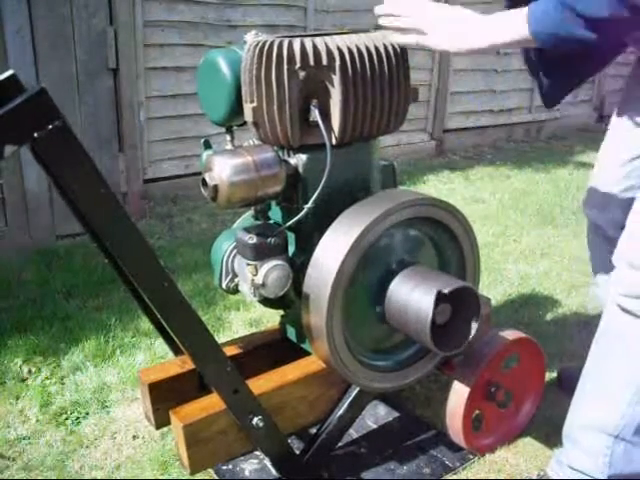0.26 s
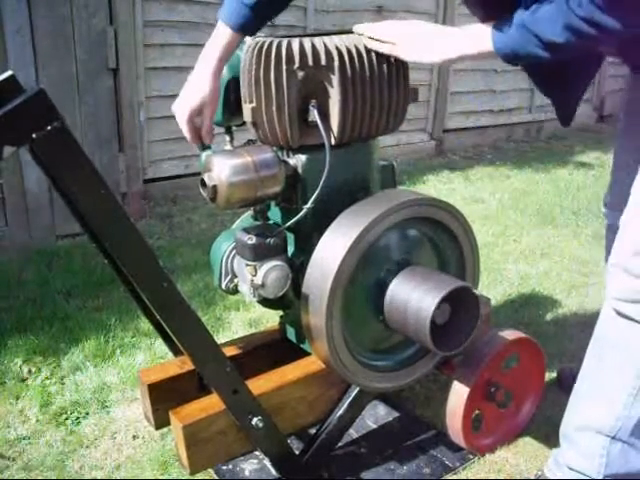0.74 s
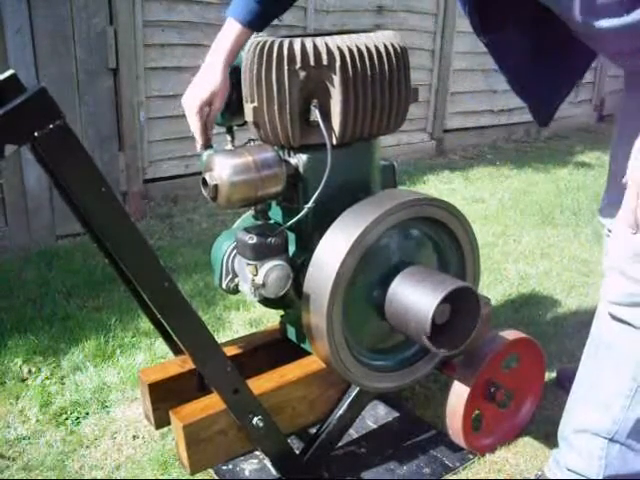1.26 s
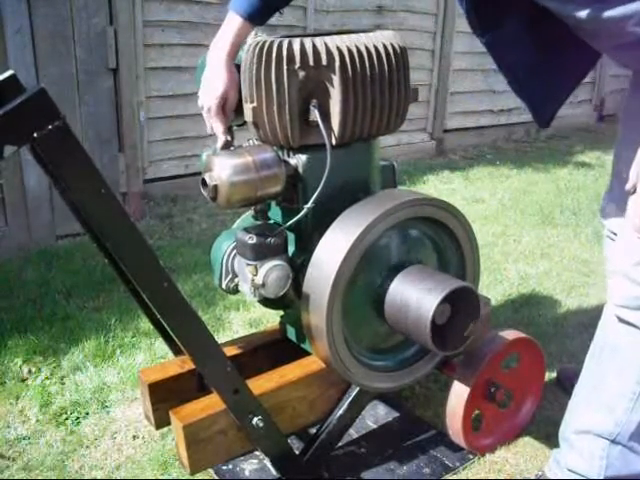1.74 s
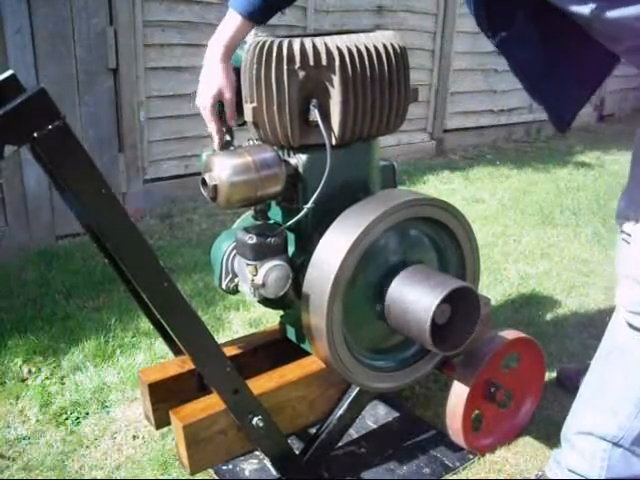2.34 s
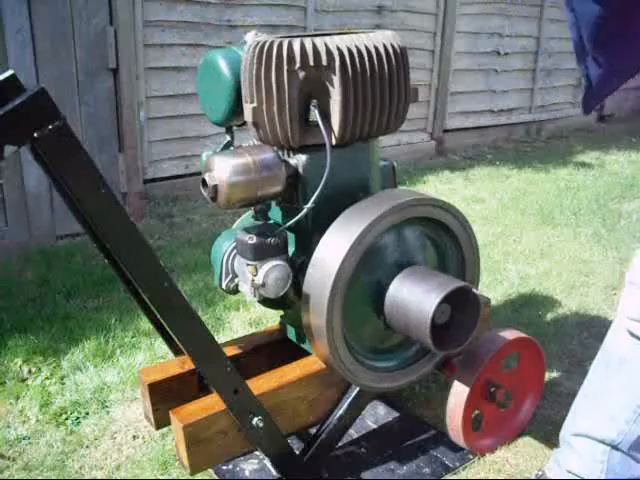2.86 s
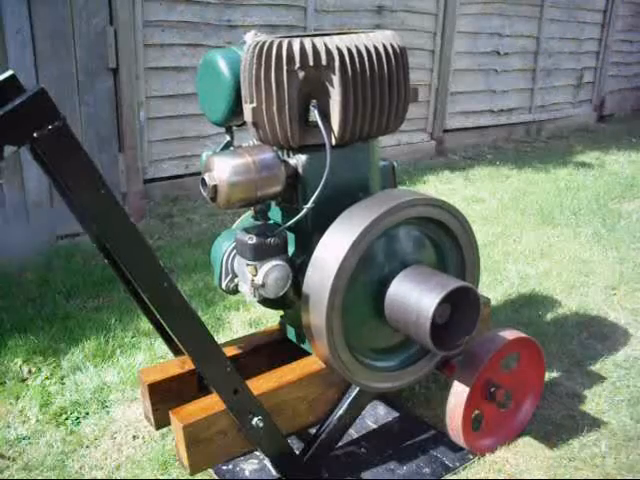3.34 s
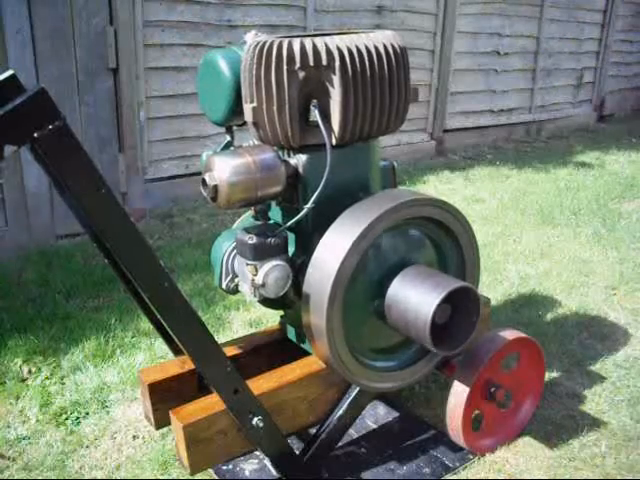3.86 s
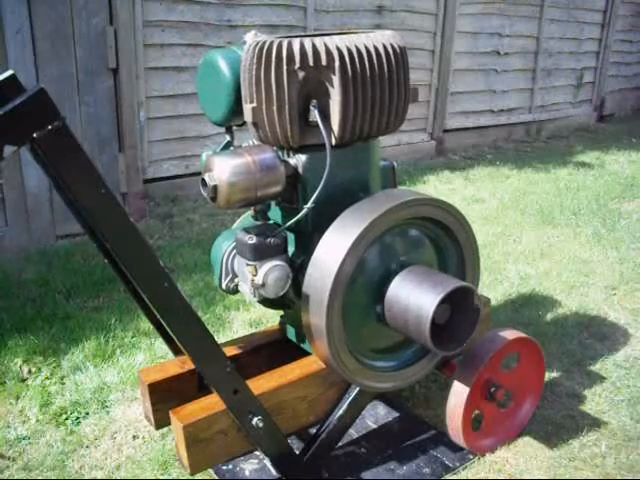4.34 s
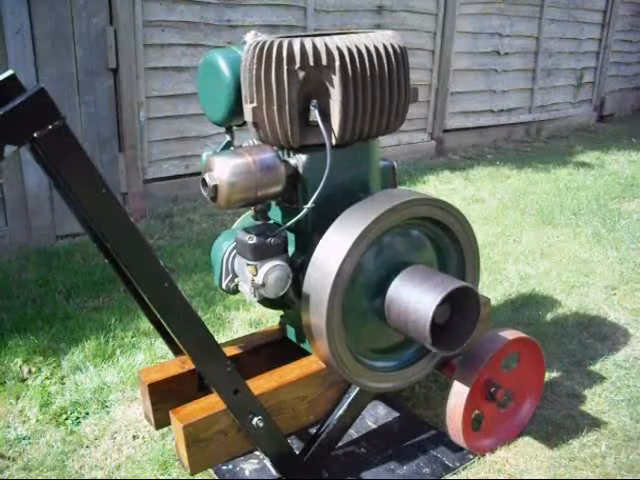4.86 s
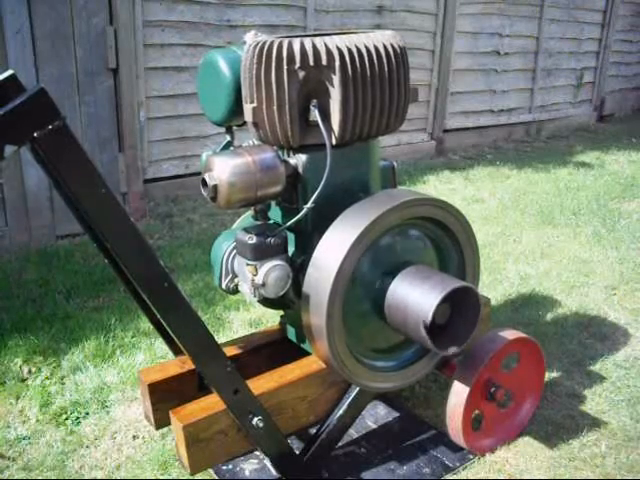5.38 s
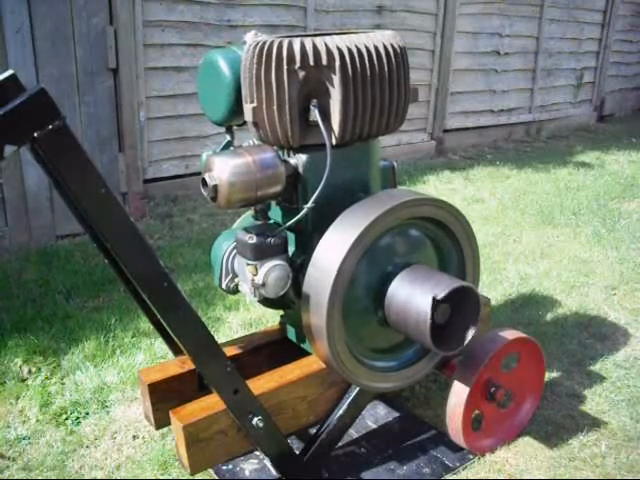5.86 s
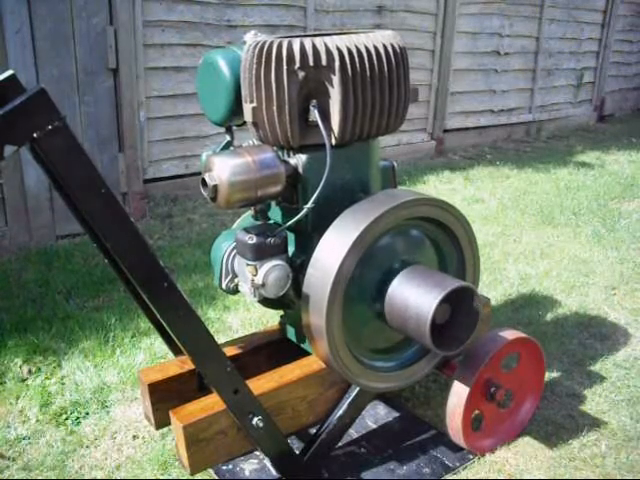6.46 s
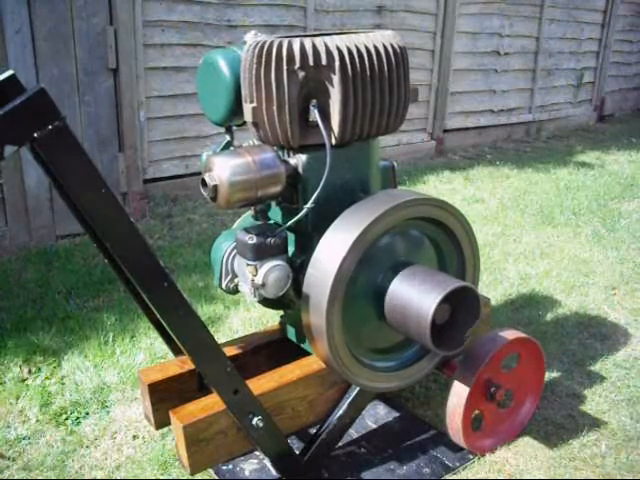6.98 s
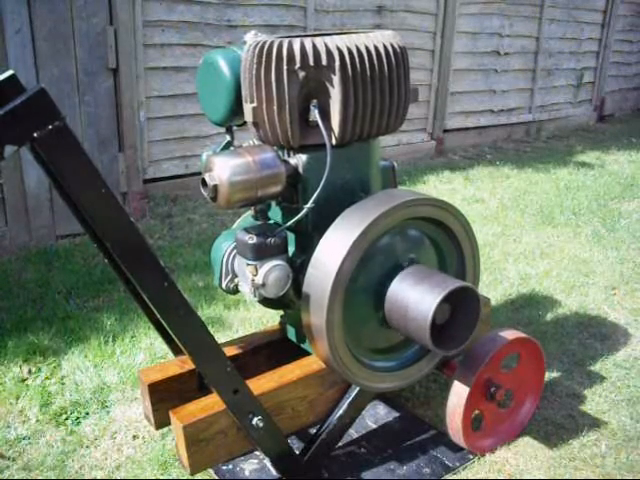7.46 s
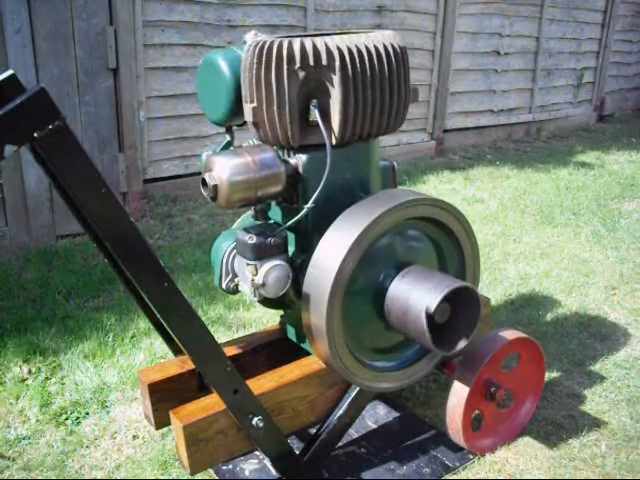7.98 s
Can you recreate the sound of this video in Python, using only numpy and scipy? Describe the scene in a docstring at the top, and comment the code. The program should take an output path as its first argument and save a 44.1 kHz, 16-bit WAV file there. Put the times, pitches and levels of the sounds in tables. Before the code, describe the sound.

A small single-cylinder stationary engine, just started, chuffs slowly with a hissing intake and grows faster and louder. After a couple of seconds it misfires for about a second, catches again, and settles into a quieter, even beat of about six firings a second. Valve clicks and a gear whirr run beneath the thumping, tinny exhaust. It is heard close by in a garden, through a cheap microphone with a glassy treble.

```python
"""A small engine warming up in a garden

A single-cylinder four-stroke petrol engine, just swung by hand, gathers speed on the choke. It runs
rich, misses a few beats as the choke opens, then settles near six firings a second. Each firing is a
pressure pulse that chuffs through a small resonant silencer, over valve impacts and gear noise; fence
and house reflect the sound. A pocket camera's low sample rate mirrors it into a glassy treble."""
import sys
import numpy as np
from scipy import signal
from scipy.fft import rfft, irfft, next_fast_len
from scipy.io import wavfile
from scipy.ndimage import uniform_filter1d

SR = 44100
rng = np.random.default_rng(int(sys.argv[2]) if len(sys.argv) > 2 else 0)


def wrap_up_sound(samples):
    """Save the sound to the file named by the first command line argument, as 16-bit audio."""
    columns = np.atleast_2d(samples).T
    # keep every value between -1 and 1, then stretch to whole-number steps
    tamed = np.clip(columns, -1, 1)
    steps = np.round(tamed * 32767).astype(np.int16)
    wavfile.write(sys.argv[1], SR, steps)


N = 362061
TIME = np.arange(N) / SR
BAND_HZ = 5600  # upper limit of the camera's passband
IDLE_RPM, IDLE_DB, IDLE_BLOWDOWN_S = 740, -27, .0159  # speed, burn level, time to empty the cylinder


def amp(db):
    """Amplitude ratio of a level in decibels."""
    return 10 ** (np.asarray(db) / 20)


def unit_rms(x):
    """Normalises a signal to unit mean power."""
    return x / np.sqrt(np.mean(x ** 2) + 1e-20)


def curve(points, at):
    """Linear interpolation in a two-column table."""
    return np.interp(at, *np.transpose(points))


def log_curve(points, hz):
    """Interpolation on a logarithmic frequency axis."""
    f, value = np.transpose(points)
    return np.interp(np.log(hz + 1), np.log(f + 1), value)


def add(mix, s, sound):
    """Superposition: mixes a sound in at time s."""
    start = round(s * SR)
    sound = sound[max(-start, 0):]
    part = mix[max(start, 0):][:len(sound)]
    part += sound[:len(part)]


def colour(x, spectrum, tilt_db=0):
    """Band-limited filtering: gives x a spectral envelope, tilted by tilt_db per octave."""
    hz = np.fft.rfftfreq(len(x), 1 / SR)
    db = log_curve(spectrum, hz) + tilt_db * np.log2(np.maximum(hz, 500) / 2000)
    return irfft(rfft(x) * amp(db) * (hz < BAND_HZ * 1.1), len(x))


def noise(spectrum, size):
    """Filtered Gaussian noise of unit power."""
    return unit_rms(colour(rng.standard_normal(next_fast_len(size)), spectrum)[:size])


def ring(modes, pitch=1):
    """Modal impulse response: a sum of damped sinusoids, with unit energy."""
    t = np.arange(SR // 6) / SR
    out = sum(amp(db - 60 * t / t60) * np.sin(2 * np.pi * hz * pitch * t) for hz, db, t60 in modes)
    return out / np.linalg.norm(out)


# crankshaft rotation: (time [s], speed [rpm])
CRANK_SPEED = [(0.0, 262.0), (0.49, 380.8), (0.8, 444.4), (1.24, 527.4), (1.61, 574.9), (2.1, 705.0),
               (2.4, 786.9), (2.8, 722.7), (3.49, 662.2), (3.51, 698.9), (3.87, 699.4), (4.3, 720.0),
               (5.45, 735.3), (6.26, 735.1), (7.45, 743.3), (8.2, 753.3)]

def strokes(first_exhaust_s=.3426):
    """Four-stroke cycle: the times of the exhausts, one every two turns, plus one beyond either end."""
    t = np.arange(-SR, N + SR, 16) / SR
    cycles = np.cumsum(curve(CRANK_SPEED, t) / 120) * (t[1] - t[0])
    cycles -= np.interp(first_exhaust_s, t, cycles)
    return np.interp(np.arange(-1, np.interp(N / SR, t, cycles) + 1), cycles, t)


def time_of(cycles):
    """Time at which the engine reaches a phase, counted in cycles."""
    return np.interp(cycles, np.arange(len(strokes())), strokes())


# envelope of the running gear: (time [s], level [dB])
GEAR_LEVEL = [(0, -44.5), (.25, -50), (.6, -46.5), (1.2, -45), (1.8, -44.5), (2.3, -42), (2.7, -48),
              (3.5, -46), (5, -46.5), (8.2, -45)]
# friction noise of gears and bearings: (frequency [Hz], relative level [dB])
GEAR_SPECTRUM = [(88, -66), (150, -19), (242, -14), (363, -13.5), (623, -8.5), (1150, -5), (1600, -2.5),
                 (1830, -0.5), (2370, -4.5), (2790, -2), (3240, -7), (4310, -10), (5400, -8), (7020, -53),
                 (11900, -120)]
# vibration of the frame on its trolley: (frequency [Hz], relative level [dB])
FRAME_SPECTRUM = [(20, 6), (40, 12), (65, 15), (110, 10.5), (170, 0), (300, -17), (600, -37)]
# cast-iron block and flywheel: (frequency [Hz], relative level [dB], decay time T60 [s])
IRON_MODES = [(481, 6.5, 0.12), (874, 2, 0.12), (981, -0.5, 0.12), (1150, 2.5, 0.17), (1463, 9.5, 0.035),
              (1805, 7, 0.018), (2110, 2.5, 0.026), (2380, -0.5, 0.022)]

def running_gear(grit=.28, iron_db=-7, whirr_db=-2, rumble_db=-3):
    """Forced vibration: gears and bearings drive the iron's modes; the frame rumbles more with speed."""
    teeth = np.exp(grit * unit_rms(uniform_filter1d(rng.standard_normal(N), 150)))
    grind = unit_rms(noise(GEAR_SPECTRUM, N) * teeth)
    iron = unit_rms(signal.oaconvolve(grind, ring(IRON_MODES))[:N])
    shake = (curve(CRANK_SPEED, TIME) / IDLE_RPM) ** .76
    rumble = shake * noise(FRAME_SPECTRUM, N)
    level = amp(curve(GEAR_LEVEL, TIME))
    return level * (amp(whirr_db) * grind + amp(iron_db) * iron + amp(rumble_db) * rumble)


def impact(spectrum, decay_s, tilt_db, attack_s=.0017):
    """Transient noise: a rattling broadband burst that decays exponentially."""
    t = np.arange(SR // 12) / SR
    rattle = unit_rms(colour(rng.standard_normal(len(t)), spectrum, tilt_db))
    return rattle * (1 - np.exp(-t / attack_s)) * np.exp(-t / decay_s)


# valve clicks and clacks, plus a dull echo-like slap at phase .25, about 40 ms after each exhaust at idle:
# (phase after exhaust [cycles], relative level [dB], decay time [s], tilt [dB/octave])
CLATTER_EVENTS = [(0.207, -33.5, 0.0064, -2), (.25, -32.5, 0.0025, -7), (.445, -42.5, 0.01, -9),
                  (.49, -29.5, 0.0033, 9), (0.519, -37.5, 0.0072, -4.5), (.67, -42, 0.0044, 3)]
# one click: (frequency [Hz], relative level [dB])
CLICK_SPECTRUM = [(300, -15), (1000, -11), (2000, 12), (3000, 16), (4200, 19), (5500, 9)]

def valve_clatter(level_db=5, scatter_db=1.0, iron_db=-8):
    """Impact excitation: valve clicks and clacks, with a dull slap, recur each cycle, louder with speed."""
    out, periods = np.zeros(N), np.diff(strokes())
    for cycle, speed in enumerate(periods.min() / periods):
        for phase, db, decay_s, tilt_db in CLATTER_EVENTS:
            gain = speed ** 2 * amp(db + level_db + scatter_db * rng.standard_normal())
            add(out, time_of(cycle + phase) - .002, gain * impact(CLICK_SPECTRUM, decay_s, tilt_db))
    return out + amp(iron_db) * signal.oaconvolve(out, ring(IRON_MODES))[:N]


def valve_window(opens, shuts, edge):
    """Periodic gating: 1 while a valve is open, with sloping edges; arguments in cycles."""
    phase = np.interp(TIME, strokes(), np.arange(len(strokes()))) % 1
    return np.clip((phase - opens) / edge, 0, 1) * np.clip((shuts - phase) / edge, 0, 1)


# air drawn through the carburettor: (time [s], hiss level [dB], gasp level [dB])
INTAKE_LEVELS = [(.1, -37.5, -60), (.46, -35.5, -56), (1.0, -36.5, -59), (1.499, -34.5, -53),
                 (1.68, -44, -31), (2.051, -46, -28), (2.38, -39, -29), (2.5, -49, -49), (3.5, -87, -44),
                 (8.1, -64, -47.5)]
# air passing the choke: (frequency [Hz], relative level [dB])
HISS_SPECTRUM = [(200, -77), (900, -28), (1700, 0.5), (2300, 8.5), (3000, 1.5), (4300, 7), (5500, 4)]
# the rich charge: (frequency [Hz], relative level [dB])
CHARGE_SPECTRUM = [(150, -21), (500, 2), (1100, 3), (2300, 6.5), (3200, 3), (5500, 1.5)]

def intake():
    """Flow noise: on each suction stroke air hisses past the choke and gasps through the carburettor."""
    s, hiss_db, gasp_db = np.transpose(INTAKE_LEVELS)
    suction = valve_window(opens=.18, shuts=.58, edge=.13)
    gulp = valve_window(opens=.22, shuts=.45, edge=.06)
    hiss = amp(np.interp(TIME, s, hiss_db)) * noise(HISS_SPECTRUM, N) * suction
    gasp = amp(np.interp(TIME, s, gasp_db)) * noise(CHARGE_SPECTRUM, N) * gulp
    return hiss + gasp


# the burn, hard on the choke and easing to idle: (time [s], level [dB], tilt [dB/octave])
BURN_STRENGTH = [(.34, -19.5, 2), (0.931, -16.5, 3), (1.4, -17.5, 2.5), (1.811, -14, -1.5),
                 (2.331, -11.5, -2), (3.14, -18, 6), (3.5, -18, -0.5), (3.67, -17.5, 1.4),
                 (4.35, -20.5, 0.5), (4.68, -19.5, -0.5), (4.85, -23.5, -2.5), (5.75, -28, -1.5),
                 (6.0, -26.5, 0), (6.649, -27, -0.5), (8.1, -28, -2.8)]
# cycles that burn badly or not at all; a negative thump factor is air sucked back in:
# (time [s], level change [dB], tilt change [dB/octave], thump factor [ratio], puff level [dB])
FAILED_BURNS = [(2.478, -26, -2, 0.29, -33), (2.64, -23, -9, -0.84, -32), (2.802, -7.5, -5.5, 0.43, -62),
                (2.97, -12, -7.5, 0.29, -55), (3.315, -24.5, -9, -0.77, -36.5)]

def firings(idle_thump=.11):
    """Blowdown: a harder burn takes longer to leave the cylinder and thumps more. One row per cycle."""
    s = strokes()[1:-1]
    at, burn_db, burn_tilt = np.transpose(BURN_STRENGTH)
    speed = curve(CRANK_SPEED, s) / IDLE_RPM
    db, tilt = np.interp(s, at, burn_db), np.interp(s, at, burn_tilt)
    blowdown_s = IDLE_BLOWDOWN_S * amp(.1342 * (db - IDLE_DB)) / np.sqrt(speed)
    height = idle_thump * amp(.07 * (db - IDLE_DB)) * speed ** .53
    for missed_s, db_change, tilt_change, thump_factor, _ in FAILED_BURNS:
        nearest = np.argmin(abs(s - missed_s))
        db[nearest] += db_change
        tilt[nearest] += tilt_change
        height[nearest] *= thump_factor
    return np.transpose([s, blowdown_s, db, tilt, height])


def knock(phase=.735, level_db=-29, db_per_burn_db=.55, idle_decay_s=.0059, iron_db=-3):
    """Impulsive excitation: each charge ignites half a turn before its exhaust and jolts the block."""
    out = np.zeros(N)
    for cycle, (_, blowdown_s, burn_db, *_) in enumerate(firings()):
        decay_s = idle_decay_s * blowdown_s / IDLE_BLOWDOWN_S
        jolt = impact(CHARGE_SPECTRUM, decay_s, tilt_db=-.5, attack_s=.001)
        add(out, time_of(cycle + phase), amp(level_db + db_per_burn_db * burn_db) * jolt)
    return out + amp(iron_db) * signal.oaconvolve(out, ring(IRON_MODES))[:N]


def thump(blowdown_s, rebound=.62, swing=.42, pop=.49, band_hz=(14, 480)):
    """Monopole radiation: pressure follows the change of a flow that swells, collapses and swings back."""
    stretch = (blowdown_s / IDLE_BLOWDOWN_S) ** .71  # slower after a long blow
    drop_s, settle_s, swing_hz = .0044 * stretch, .0075 * stretch, 116 / np.sqrt(stretch)
    t = np.arange(SR // 8) / SR
    peak_s, empty_s = blowdown_s - drop_s / 2, blowdown_s + drop_s / 2
    after = np.maximum(t - empty_s, 0)
    swell = np.minimum(t / peak_s, 1) ** (225 * blowdown_s / stretch)
    collapse = 1 - (1 + rebound) * (t - peak_s) / drop_s
    sway = 1 - swing + swing * np.cos(2 * np.pi * swing_hz * after)
    backflow = -rebound * np.exp(-after / settle_s) * sway
    flow = np.select([t < peak_s, t < empty_s], [swell, collapse], backflow)
    pressure = np.gradient(flow) * SR * drop_s / (1 + rebound)
    pressure -= pop * np.exp(-.5 * ((t - .0006) / .00063) ** 2)  # the valve cracks open
    return signal.sosfilt(signal.butter(1, band_hz, "bandpass", fs=SR, output="sos"), pressure)


# rush of gas at the outlet: (frequency [Hz], relative level [dB])
JET_SPECTRUM = [(100, -10), (290, -49), (410, 1.5), (630, -56), (880, -79), (1250, -12), (1550, -12),
                (2100, 6), (2450, -0.5), (3100, 10), (3800, 4.5), (4400, 9.5), (4900, 11.5), (5500, 1)]
# the silencer's thin steel shell: (frequency [Hz], relative level [dB], decay time T60 [s])
SHELL_MODES = [(1250, -7, .02), (1430, -10, .03), (1868, -5, .045), (2150, -4, .025), (2720, -5, .025),
               (2826, -3, .035), (2910, -1, .04), (3420, -5, .02), (3620, -1, .035), (4140, -3, .03),
               (4340, -1, .025), (4436, 1, .04), (4550, -1, .03), (5330, -3, .02)]

def blast(blowdown_s, db, tilt_db, leak=.27, fade_s=.0098, crackle=.21, shell_db=-2):
    """Jet noise: gas leaks as the valve lifts, then bursts out, crackling and rattling the shell."""
    t = np.arange(SR // 5) / SR
    progress = t / blowdown_s
    burst = np.exp(-.5 * ((progress - .64) / .17) ** 2)
    trickle = leak * np.clip(progress / .19, 0, 1) * np.exp(-np.maximum(t - blowdown_s, 0) / fade_s)
    shocks = np.exp(crackle * np.repeat(rng.standard_normal(len(t)), 12)[:len(t)])
    rush = rng.standard_normal(len(t)) * shocks * np.hypot(burst, trickle)
    shell = signal.fftconvolve(rush, ring(SHELL_MODES))[:len(t)]
    chuff = unit_rms(colour(rush, JET_SPECTRUM, tilt_db)) + amp(shell_db) * unit_rms(shell)
    return amp(db) * unit_rms(chuff) * np.sqrt(.04 / t[-1])  # the energy of 40 ms at level db


# effect of the exhaust gas's heat and richness: (time [s], speed of sound [ratio])
SOUND_SPEED = [(.3, .996), (1.4, 1.004), (1.61, 1.03), (2.33, 1.062), (2.8, 1.048), (3.14, 1.0),
               (3.67, 1.008), (4.2, .997), (5.4, .995), (6.0, .987), (8.1, .985)]
# gas in the silencer can: (frequency [Hz], relative level [dB], decay time T60 [s])
CAVITY_MODES = [(2830, -12, .09), (2990, -9, .09), (3790, -11, .09), (4015, 0, .13), (4230, -2, .12),
                (4400, -12, .08), (4625, -6, .1)]

def ping(s, db, scatter_db=1.5, attack_s=.002, waver_rad=.3):
    """Cavity resonance: the can's modes scale with the speed of sound and waver as the hot gas swirls."""
    t = np.arange(SR // 5) / SR
    pitch = curve(SOUND_SPEED, s)
    out = np.zeros(len(t))
    for hz, mode_db, t60 in CAVITY_MODES:
        swirl = waver_rad * unit_rms(uniform_filter1d(rng.standard_normal(len(t)), 400))
        envelope = amp(db + mode_db + scatter_db * rng.standard_normal() - 60 * t / t60)
        out += envelope * np.sin(2 * np.pi * (hz * pitch * t + rng.random()) + swirl)
    return out * (1 - np.exp(-t / attack_s))


# gas column of the exhaust pipe: (frequency [Hz], relative level [dB], decay time T60 [s])
PIPE_MODES = [(192, -17.5, .075), (385, -22.5, 0.056)]

def boom(attack_s=.00047):
    """Standing waves: the pipe's low modes sound briefly after a pulse."""
    t = np.arange(SR // 8) / SR
    modes = sum(amp(db - 60 * t / t60) * np.cos(2 * np.pi * hz * t) for hz, db, t60 in PIPE_MODES)
    return -modes * np.minimum(t / attack_s, 1)


def exhaust(blast_db=.5, thump_db=-2.5, ring_db=-6, scatter_db=.8):
    """Pulse train: every exhaust stroke thumps, blasts, pings and booms; hard, sharp blasts ping most."""
    out = np.zeros(N)
    for s, blowdown_s, burn_db, tilt_db, height in firings():
        db = burn_db + scatter_db * rng.standard_normal()
        ping_db = IDLE_DB + ring_db + 1.4 * (db - IDLE_DB) + tilt_db
        opens_s = s - blowdown_s
        add(out, opens_s - .0003, amp(thump_db) * height * thump(blowdown_s))
        add(out, opens_s, blast(blowdown_s, db + blast_db, tilt_db))
        add(out, s - .31 * blowdown_s, ping(s, ping_db))
        add(out, s, height * boom())
    return out


def misfire_puffs(length_s=.051, lead_s=.0081):
    """Displacement flow: after a misfire the rising piston pushes the cold charge out in a soft puff."""
    out, size = np.zeros(N), int(length_s * SR)
    for s, *_, db in FAILED_BURNS:
        add(out, s - lead_s, amp(db) * noise(CHARGE_SPECTRUM, size) * signal.windows.tukey(size, .8))
    return out


# echoes off fence and house: (delay [s], level [dB])
REFLECTIONS = [(.0085, -24.5), (0.0173, -46), (.03, -24.5), (0.0354, -25), (.046, -29)]
# scattered sound in the garden: (frequency [Hz], decay time T60 [s])
REVERB_TIMES = [(60, 0.23), (300, 0.69), (1200, 0.25), (3000, 0.17), (5500, 0.13)]

def garden(x, tail_db=-17, dull_hz=3000):
    """Reflection and scattering: a few dull echoes and a short diffuse tail join the direct sound."""
    dull = signal.sosfilt(signal.butter(1, dull_hz, fs=SR, output="sos"), x)
    out = x.copy()
    for delay, db in REFLECTIONS:
        add(out, delay, amp(db) * dull)
    hz, t, bands = signal.stft(rng.standard_normal(SR // 2), SR, nperseg=256)
    decay = amp(-60 * t / log_curve(REVERB_TIMES, hz)[:, None])
    tail = signal.istft(bands * decay * np.minimum(t / .0017, 1), SR, nperseg=256)[1]
    return out + amp(tail_db) * signal.oaconvolve(x, tail / np.linalg.norm(tail))[:N]


def scene():
    """Superposition: the engine's gas and mechanical sounds sum in the garden, in one channel."""
    engine = exhaust() + misfire_puffs() + intake() + valve_clatter() + knock() + running_gear()
    return garden(engine)[None]


def record(dry, hold=4, edge_hz=15650):
    """Spectral imaging: the camera samples slowly, clips and holds each value, mirroring the band upward."""
    narrow = signal.oaconvolve(dry, signal.firwin(101, BAND_HZ, fs=SR)[None], "same")
    samples = np.clip(narrow[:, ::hold], -1, 1)
    held = np.repeat(samples, hold, axis=1)[:, :N]
    return signal.oaconvolve(held, signal.firwin(511, edge_hz, window=("kaiser", 9), fs=SR)[None], "same")


dry = scene()
out = record(dry)
wrap_up_sound(out)
```